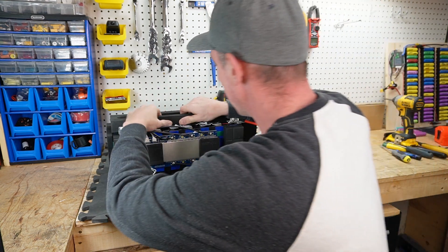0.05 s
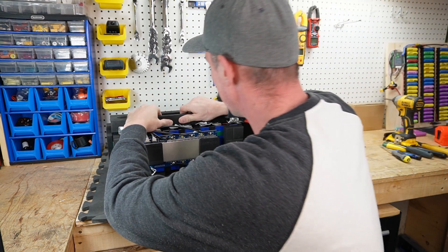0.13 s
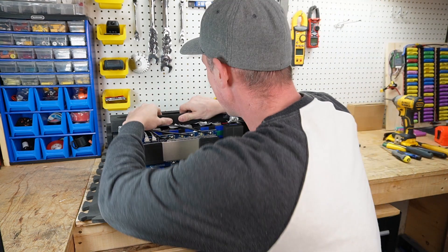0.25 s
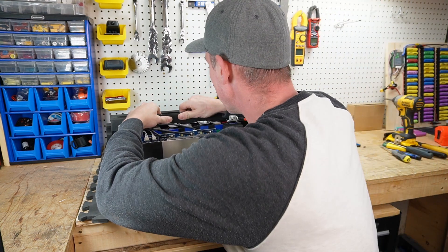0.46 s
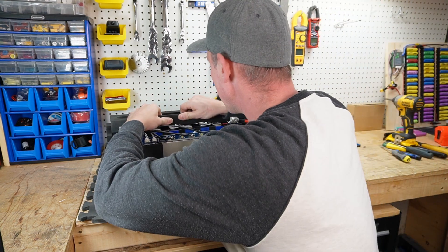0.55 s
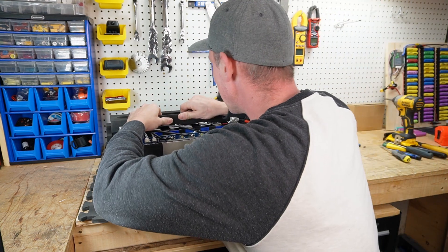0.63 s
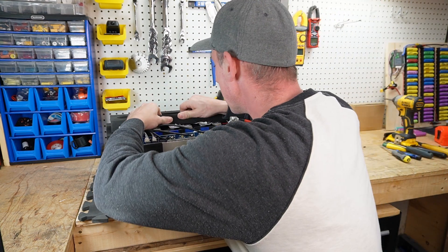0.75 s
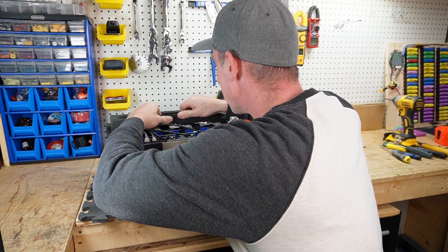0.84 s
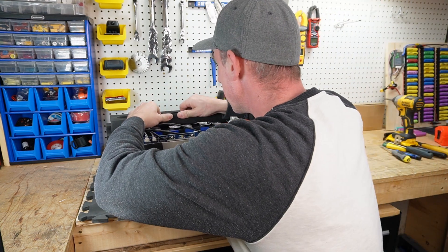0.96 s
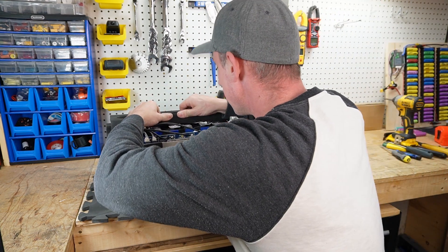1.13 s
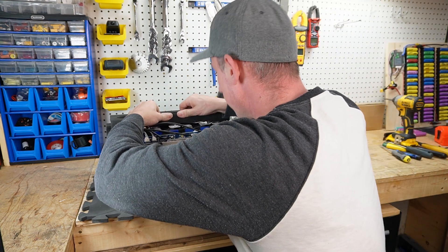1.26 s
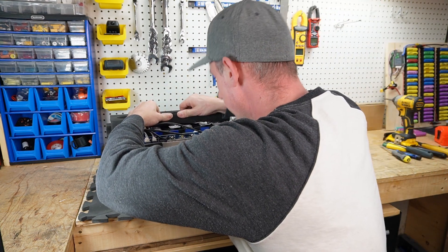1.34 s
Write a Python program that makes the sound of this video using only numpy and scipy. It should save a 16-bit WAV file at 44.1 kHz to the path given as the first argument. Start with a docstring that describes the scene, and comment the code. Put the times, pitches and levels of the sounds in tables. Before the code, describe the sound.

Sharp glue snaps as foam is peeled from a plastic-cased battery pack, with scratchy rustling between

```python
"""Glue threads snap as foam padding is torn off a battery pack on a workshop bench, near one microphone.
Each snap is a burst of decaying sines, the modes of the plastic case, and feeds a noise-tail room echo.
Fingers thud in short sinking bass pulses, glue rips in runs of resonant clicks, and the foam rubs as
coloured hiss and grains with a thin sliding squeal. A faint rumble of low filtered noise lies under it."""
import sys
import numpy as np
from scipy import signal
from scipy.fft import rfft, irfft
from scipy.io import wavfile
from scipy.ndimage import uniform_filter1d

SR = 44100
rng = np.random.default_rng(int(sys.argv[2]) if len(sys.argv) > 2 else 0)


def unload_wav(signal):
    """Save mono or channel-first audio to the path in sys.argv[1] as 16-bit WAV at rate SR, clipped to [-1, 1]."""
    wavfile.write(
        sys.argv[1],
        SR,
        np.round(np.clip(np.atleast_2d(signal).T, -1, 1) * 32767).astype(np.int16),
    )


def ratio_of_db(decibels):
    """Turn decibels (scalar or array-like) into linear amplitude factors; 0 dB maps to 1."""
    return 10 ** (np.asarray(decibels, float) / 20)


N = 61739  # length in samples


def set_rms(x, db):
    """Scales a sound to an rms level in dB."""
    return x * ratio_of_db(db) / np.sqrt(np.mean(x ** 2))


def colour(x, points, lo_hz=0, hi_hz=1e5):
    """Weights the spectrum by (f/Hz, gain/dB) points on a log frequency axis, within a band."""
    hz = np.maximum(np.arange(len(x) // 2 + 1) * SR / len(x), 1)
    points_hz, points_db = np.array(points, float).T
    gain = ratio_of_db(np.interp(np.log(hz), np.log(points_hz), points_db))
    in_band = (hz >= lo_hz) * (hz < hi_hz)
    return irfft(rfft(x) * gain * in_band, len(x))


def add(track, start_s, sound):
    """Mixes a short sound into a track at a time."""
    i = max(int(start_s * SR), 0)
    track[i:i + len(sound)] += sound[:len(track) - i]


def walk(rate_hz):
    """Random levels, one per 1 / rate_hz, joined by slides; spread near 1."""
    hold = int(SR / rate_hz)
    steps = np.repeat(rng.standard_normal(N // hold + 1), hold)
    return 0.806 * uniform_filter1d(steps, hold)[:N]


def ring(modes, chance, shorten, scale=1):
    """Decaying sines of one band of case modes, set off by a break that takes a moment."""
    break_s, rms_window_s = 0.00016, 0.008
    detune, scatter_db = 0.048, 3  # spread of pitch (as a ratio) and of mode level
    t = np.arange(2048) / SR
    out = np.zeros(len(t))
    for k, ((hz, db, t60), (level_draw, pitch_draw)) in enumerate(zip(modes, chance)):
        gain = (-1) ** k * ratio_of_db(db + scatter_db * level_draw)
        mode_hz = scale * hz * (1 + detune * pitch_draw)
        decay = np.exp(-np.log(1000) * t / (t60 * shorten))
        out += gain * np.sin(2 * np.pi * mode_hz * t) * decay
    out = out * (1 - np.exp(-(t / (break_s * shorten)) ** 2))
    return out / np.sqrt(np.sum(out ** 2) / (rms_window_s * SR))  # unit rms over the window


def snaps():
    """Glue threads let go and ring four bands of case modes; returns direct sound and room feed."""
    # snaps: t/s, main ring peak level/dB, main ring f/Hz,
    # low, high and top band rms level/dB re that peak, room feed level/dB re the direct sound
    snap_table = [(0.21, 1.5, 3090, -32, -24.5, -27, -22), (0.3, -12.5, 3140, -31, -14.5, -16, -6),
                  (0.3257, -10.5, 3360, -34, -22, -19, -6.5), (0.4336, -26.5, 3470, -59, -14, -19, -10.5),
                  (0.497, -33.5, 3200, -36, -20, -15.5, -10), (0.542, -31, 3070, -15.5, -21, -18, -8),
                  (0.557, -28, 3080, -39, -22, -26, -20), (0.577, -28.5, 3150, -22.5, -31, -21, -13),
                  (0.586, -33, 3030, -37, -23, -19, -24), (0.6389, -22, 2990, -21.5, -18, -16, -13),
                  (0.7049, -40, 3060, -7, -14, -19, -23), (0.721, -33, 3170, -10, -5.5, -6.5, -14.5),
                  (0.77, -35, 3100, 0, -14, -9, -16.5), (0.8589, -30, 2900, -24, -13.5, -9.5, -14),
                  (0.9014, -7.5, 2750, -18, -14, -24, -12), (1.0184, -32.5, 2700, -20, -3.5, -7, -13.5),
                  (1.0421, -44.5, 2900, -24.5, -3, -5, -8), (1.047, -33, 2700, -20, -4.5, -4.5, -19),
                  (1.063, -32.5, 3550, -28, -22, -22, -12),
                  (1.0901, -4.5, 3390, -30.5, -16.5, -22.5, -12.5),
                  (1.1092, -16.5, 3100, -19, -12.5, -13.5, -10.5), (1.1202, -40.5, 3480, -6, -8, -1, 1),
                  (1.1646, -12, 3350, -22, -37, -21.5, -17.5), (1.2475, -36, 3440, -25, -48, -33, -14),
                  (1.2554, -44, 4000, -18, -10, -4.5, -12), (1.277, -53, 3520, -22, -6, 2, -8),
                  (1.293, -42.5, 3140, -22, -9, -7, -10)]
    # modes of the case: f/Hz, relative level/dB, t60/s
    low_modes = [(278, -13, 0.0094), (649, 0.5, 0.0052), (994, 3, 0.0061), (1500, -4.5, 0.017)]
    high_modes = [(4950, 14.8, 0.0034), (7150, 0.63, 0.0069)]
    top_modes = [(8750, 18, 0.0012), (10990, 8.5, 0.0027), (12300, -6, 0.0023), (14200, 5, 0.0034)]
    # modes of the main ring: pitch as a ratio to the f/Hz of the snap, relative level/dB, t60/s
    ring_modes = [(.85, -3.5, 0.0021), (1.0, 4.5, 0.0057), (1.28, -7.5, 0.0019)]
    delay_s = 0.0007  # each snap sounds this long after its listed time
    echo_blur = 0.23  # the room hears the rings this much shorter
    middle_db = -22.5  # a snap of this strength keeps the top band as listed
    small_is_bright = 1  # dB per octave of top-band tilt lost for each dB above middle_db

    direct, room_feed = np.zeros(N), np.zeros(N)
    chance = rng.standard_normal((len(snap_table), 4, 4, 2))
    for (s, peak_db, hz, low_db, high_db, top_db, echo_db), draws in zip(snap_table, chance):
        tilt = small_is_bright * (peak_db - middle_db)
        tilted_top = [(f, db - tilt * np.log2(f / top_modes[0][0]), t60) for f, db, t60 in top_modes]
        bands = ((low_modes, low_db), (high_modes, high_db), (tilted_top, top_db))
        crest = np.abs(ring(ring_modes, draws[0], 1, hz)).max()
        for track, shorten, db in ((direct, 1, peak_db), (room_feed, echo_blur, peak_db + echo_db)):
            sound = -ring(ring_modes, draws[0], shorten, hz) / crest
            for (modes, band_db), band_draws in zip(bands, draws[1:]):
                sound = sound - ratio_of_db(band_db) * ring(modes, band_draws, shorten)
            add(track, s + delay_s, sound * ratio_of_db(db))
    return direct, room_feed


def room(x):
    """A noisy tail, each band with its own decay, swelling briefly with echoes from the bench."""
    # bands of the tail: centre f/Hz, relative level/dB, t60/s
    room_bands = [(298, -6.5, 0.048), (1610, 3, 0.17), (2960, 2, .16), (5950, 2, 0.17), (11400, 1.5, 0.12)]
    bench_echo_s, bench_spread_s, bench_echo_db = 0.0049, 0.0028, 0.5
    onset_s = 0.00038
    t = np.arange(SR // 3) / SR
    splits_hz = [0] + [np.sqrt(a[0] * b[0]) for a, b in zip(room_bands, room_bands[1:])] + [SR]
    noise = rng.standard_normal(len(t))
    tail = np.zeros(len(t))
    for (hz, db, t60), lo, hi in zip(room_bands, splits_hz, splits_hz[1:]):
        tail += ratio_of_db(db) * colour(noise, [(1, 0)], lo, hi) * np.exp(-np.log(1000) * t / t60)
    onset = 1 - np.exp(-(t / onset_s) ** 2)
    bench = 1 + ratio_of_db(bench_echo_db) * np.exp(-((t - bench_echo_s) / bench_spread_s) ** 2)
    return signal.fftconvolve(x, tail * onset * bench / np.sqrt(0.01 * SR))[:N]


def thuds():
    """Soft pushes of the fingers, a short bass pulse each; at times the hollow case rings on one note."""
    # finger thuds: t/s, nominal level/dB, starting f/Hz
    thud_table = [(0.1009, -28, 292), (0.151, -29.5, 255), (0.174, -31, 224), (0.537, -38, 297),
                  (0.59, -45.5, 68.4), (.902, -34.5, 227), (1.164, -42, 236)]
    # hollow knocks of the case: t/s, rms level/dB over 8 ms, f/Hz, t60/s
    knock_table = [(0.152, -41, 656, 0.02), (1.165, -35, 1450, 0.044)]
    rise_cycles, sag = 0.88, 0.081  # time scale of the pulse; pitch sinks as the finger settles
    out, t = np.zeros(N), np.arange(2048) / SR
    for s, db, hz in thud_table:
        u = t * hz / rise_cycles
        envelope = np.e * u * np.exp(-u) * np.exp(-u * u / 4)
        add(out, s, ratio_of_db(db) * envelope * np.sin(2 * np.pi * hz * t / (1 + sag * u)))
    for s, db, hz, t60 in knock_table:
        add(out, s, ratio_of_db(db) * ring([(hz, 0, t60)], [(0, 0)], 1))
    return out


def rips():
    """Runs of tiny glue breaks through one broad resonance, fading as the run goes on."""
    # short rips: t/s, length/s, rms level/dB, resonance f/Hz, sharpness Q of each of two filters
    rip_table = [(0.063, 0.012, -41, 3930, 0.57), (0.153, 0.022, -44.5, 1310, 0.92),
                 (.531, 0.033, -51.5, 4700, 2.8), (0.612, 0.033, -45, 2920, 2.7),
                 (0.913, 0.049, -37.5, 3150, 4.4)]
    breaks_per_s, fade_db = 9000, -15.5  # the fade is reached at the end of the run
    out = np.zeros(N)
    for s, length_s, db, hz, q in rip_table:
        n = int(length_s * SR)
        chance = rng.random((3, n))
        hits = chance[0] < breaks_per_s / SR
        polarity = chance[1] - 0.5
        strength = -np.log(chance[2] + 1e-9)
        breaks = hits * polarity * strength + 0.02 * polarity  # the last term is a faint hiss
        breaks = breaks * ratio_of_db(fade_db * np.arange(n) / n)
        breaks = np.append(breaks, np.zeros(300))  # time to ring out
        resonance = np.tile(np.hstack(signal.iirpeak(hz, q, SR)), (2, 1))
        add(out, s, set_rms(signal.sosfilt(resonance, breaks), db))
    return out


def rubbing():
    """Foam rubs as hiss plus tiny tearing grains of uneven size, each band with its own levels."""
    # rubbing: t/s, then level/dB before the flicker in four bands, low to high
    rub_table = [(0, -49.5, -42.5, -43.5, -46.5), (0.079, -48.5, -47.5, -43, -49.5),
                 (.14, -52, -50, -54.5, -54), (.27, -59, -52.5, -55, -58.5),
                 (0.399, -60.5, -60.5, -50, -53), (0.511, -62, -57.5, -52.5, -56),
                 (.55, -50, -52.5, -53.5, -53), (.66, -53, -52, -54, -54.5), (.85, -53, -51, -50.5, -55.5),
                 (1.03, -54, -51.5, -55.5, -57), (1.109, -62, -54, -61.5, -54.5),
                 (1.22, -73.5, -66, -60.5, -62.5), (1.3, -57.5, -61, -59, -55.5),
                 (1.4, -57, -58.5, -60, -59)]
    # colour within the bands: f/Hz, relative level/dB per Hz
    rub_colour = [(100, -12), (290, 6.5), (440, -4.5), (1200, -2.5), (1700, -4.5), (1900, -11.5),
                  (3250, -3.5), (3900, -9), (5200, -10), (5900, -19), (7500, -20.5), (16000, -23.5)]
    # limits of the four bands: f/Hz
    rub_splits = [100, 450, 1900, 6000, 16000]
    grains_per_s, grain_spread_db, grain_db = 2000, 1.8, -5  # grain_db is re the hiss
    flicker_db = 4
    hits = rng.random(N) < grains_per_s / SR
    grains = hits * rng.standard_normal(N) * ratio_of_db(grain_spread_db * rng.exponential(size=N))
    grain_shape = rng.standard_normal(40) * np.exp(-np.arange(40) / 12)
    grains = np.convolve(grains, grain_shape)[:N]
    raw = rng.standard_normal(N) + set_rms(grains, grain_db)

    t, points = np.arange(N) / SR, np.array(rub_table, float)
    shared, out = walk(24.82), np.zeros(N)  # all bands flicker partly together
    for k, (lo, hi) in enumerate(zip(rub_splits, rub_splits[1:])):
        flicker = flicker_db * (0.5 * shared + 0.77 * walk(40.59))
        db = np.interp(t, points[:, 0], points[:, k + 1]) + flicker
        out += set_rms(colour(raw, rub_colour, lo, hi), 0) * ratio_of_db(db)
    return out


def slide():
    """Thin squeal of sliding foam: a sine that sinks slowly while its pitch and level waver."""
    # squeal: t/s, f/Hz and rms level/dB before the waver
    slide_table = [(0.66, 1654, -66), (.8, 1630, -54.5), (.9, 1541, -54), (0.999, 1504, -57.5),
                   (1.09, 1473, -70)]
    waver_db, waver_hz = 4, 40
    t = np.arange(N) / SR
    at_s, at_hz, at_db = np.array(slide_table, float).T
    gain = np.interp(t, at_s, ratio_of_db(at_db), left=0, right=0) * ratio_of_db(waver_db * walk(70.26))
    hz = np.interp(t, at_s, at_hz) + waver_hz * walk(90)
    return np.sqrt(2) * gain * np.sin(2 * np.pi * np.cumsum(hz) / SR)


def rumble():
    """Faint low noise, coloured below 140 Hz, that swells and sinks."""
    # colour: f/Hz, relative level/dB per Hz
    rumble_colour = [(20, -0.5), (55, -1.5), (110, -7)]
    # swell: t/s, level/dB
    rumble_swell = [(0, -54.5), (.2, -58.5), (.4, -63.5), (.55, -53.5), (.85, -56), (1.101, -68),
                    (1.4, -57)]
    swell = ratio_of_db(np.interp(np.arange(N) / SR, *np.array(rumble_swell, float).T))
    return set_rms(colour(rng.standard_normal(N), rumble_colour, 8.7, 140), 0) * swell


def side_trace(mid):
    """The side signal: the mid smeared by 100 samples of noise, plus a faint hiss."""
    # colour of the smeared trace: f/Hz, gain/dB
    width_colour = [(100, -18), (1000, -24), (3000, -25.5), (12000, -16)]
    # colour of the hiss: f/Hz, relative level/dB per Hz
    hiss_colour = [(100, -30), (9000, -18), (13000, 18), (16000, 15)]
    smear = set_rms(rng.standard_normal(100), -24)
    trace = colour(np.convolve(mid, smear)[:N], width_colour)
    hiss = colour(rng.standard_normal(N), hiss_colour, 50, 16000)
    return trace + set_rms(hiss, -72)


def scene():
    """Sums all layers, nearly mono, into left and right."""
    direct, room_feed = snaps()
    mid = direct + room(room_feed) + thuds() + rips() + rubbing() + slide() + rumble()
    side = side_trace(mid)
    return np.array([mid + side, mid - side])


def top_cut(x):
    """Nothing passes above the cut-off."""
    return signal.sosfilt(signal.butter(12, 16800, fs=SR, output="sos"), x)


def record(dry):
    """A steep low-pass at 16.7 kHz cuts the top; the loudest snaps are clipped at full scale."""
    low_pass = signal.ellip(8, 0.2, 60, 16700, fs=SR, output="sos")
    mix = np.clip(signal.sosfilt(low_pass, dry), -1, 1)
    return top_cut(mix)


dry = scene()
out = record(dry)
unload_wav(out)
```